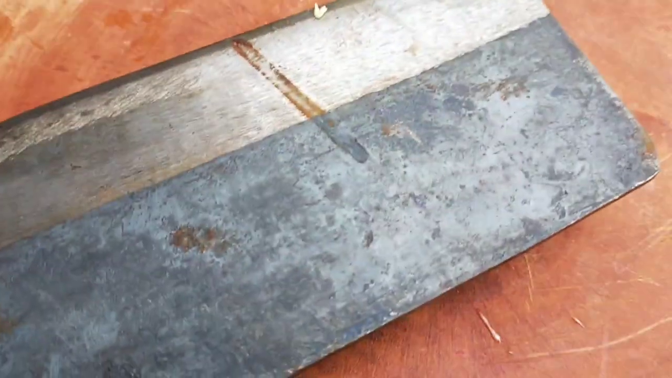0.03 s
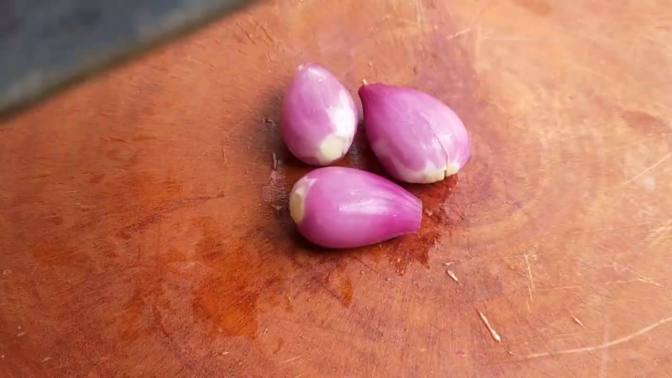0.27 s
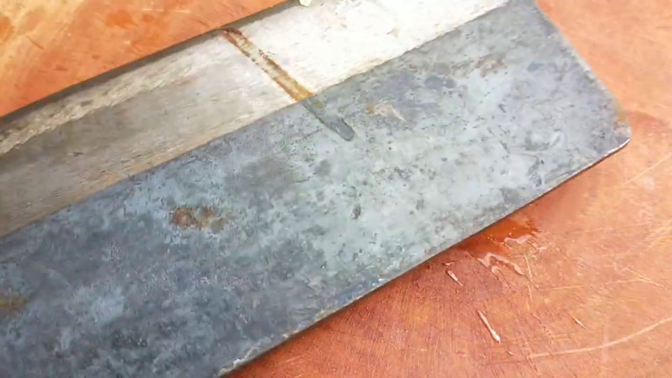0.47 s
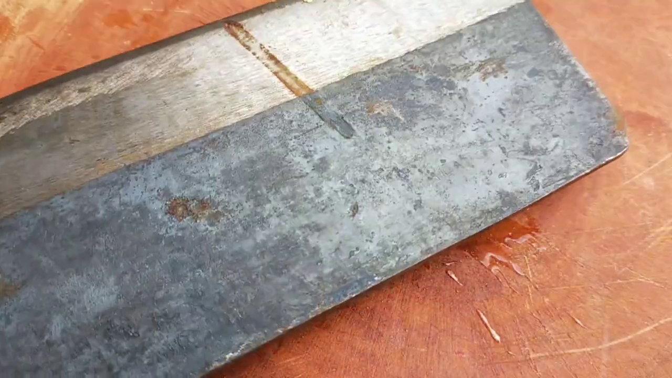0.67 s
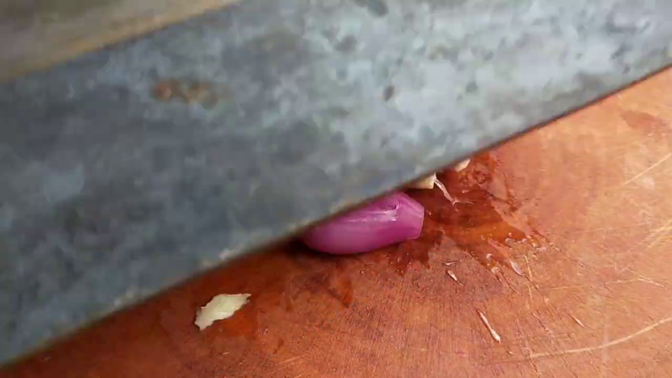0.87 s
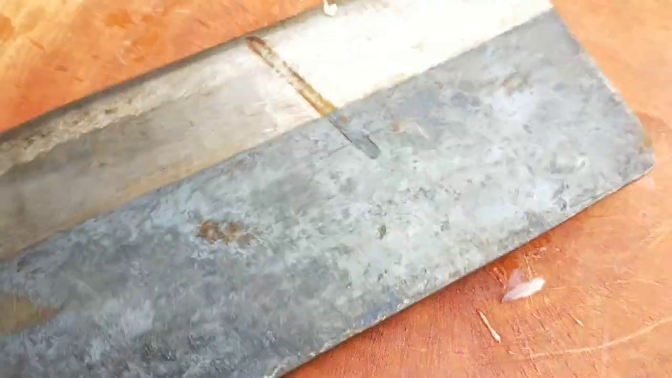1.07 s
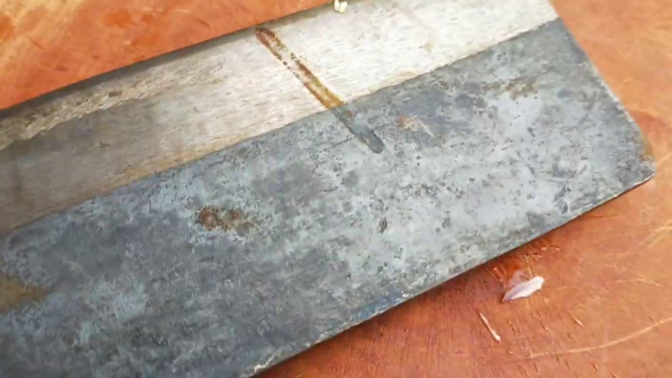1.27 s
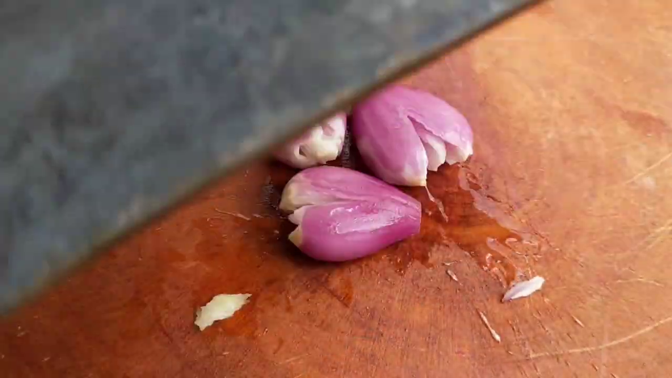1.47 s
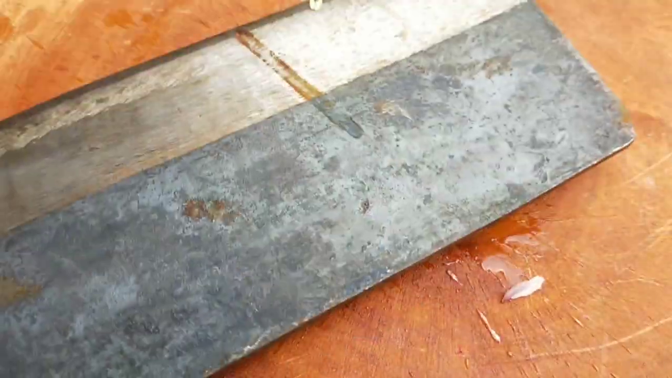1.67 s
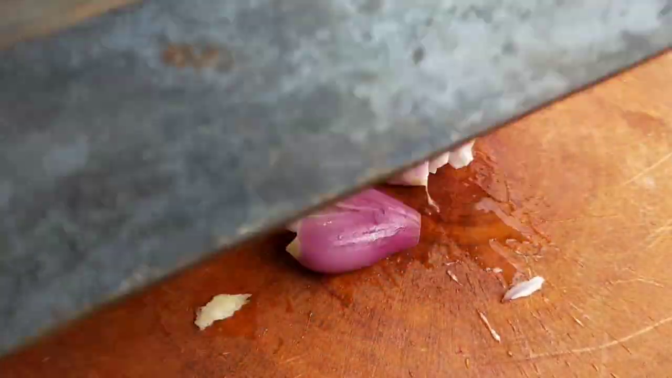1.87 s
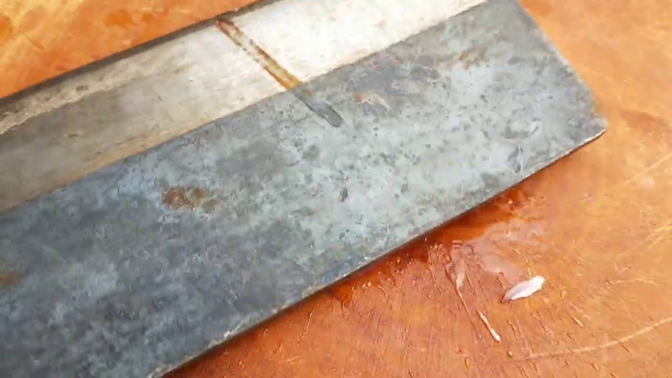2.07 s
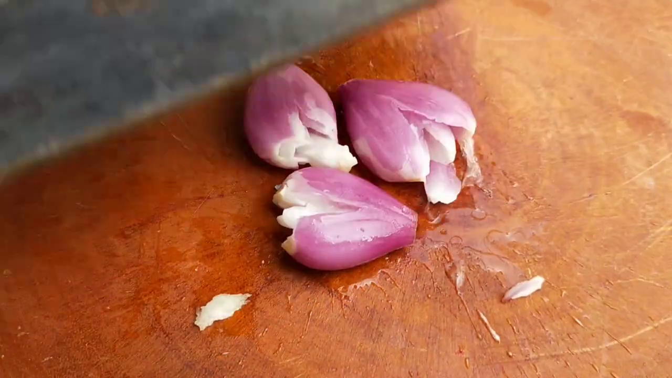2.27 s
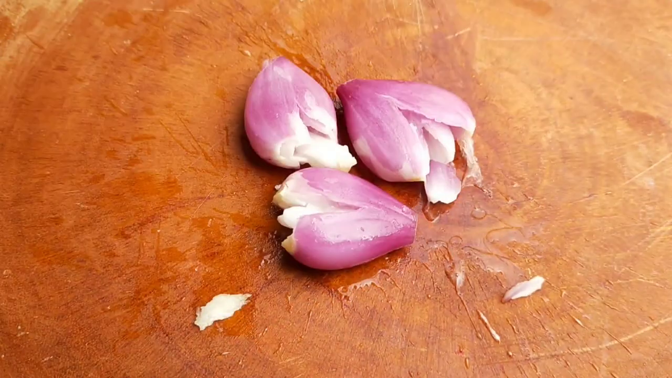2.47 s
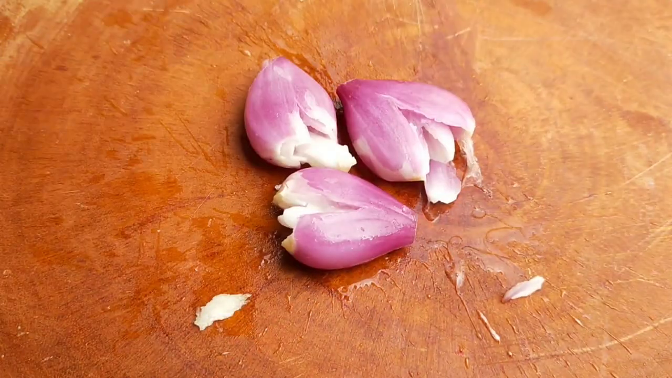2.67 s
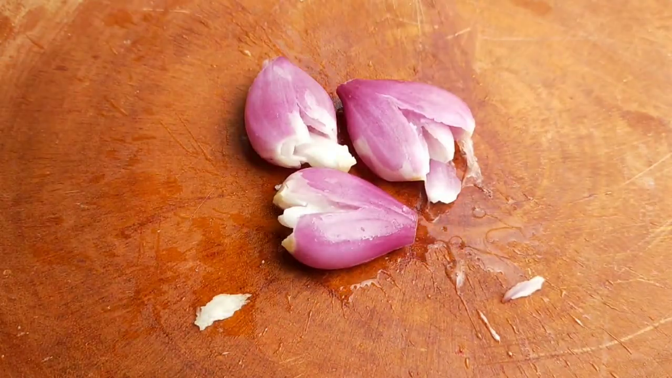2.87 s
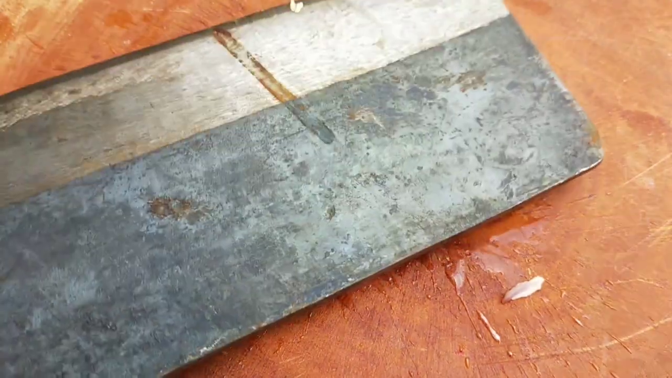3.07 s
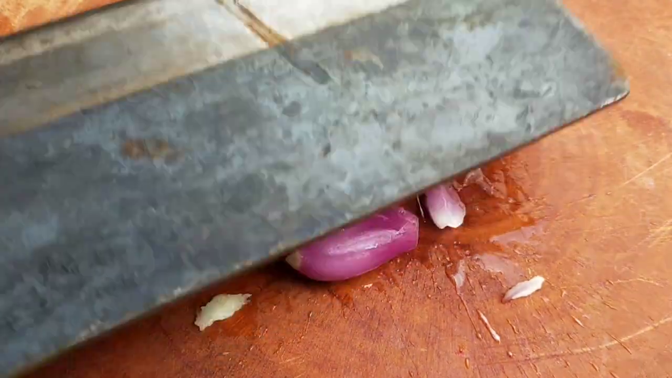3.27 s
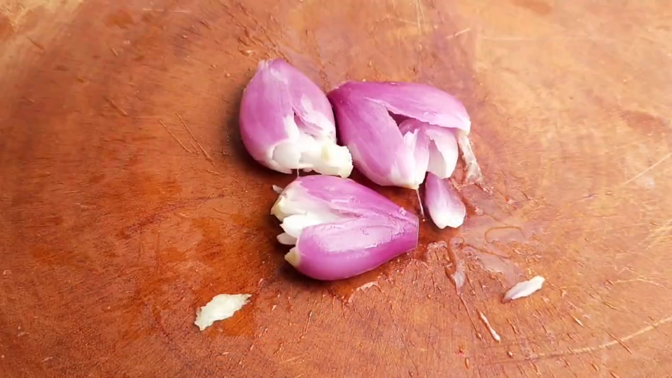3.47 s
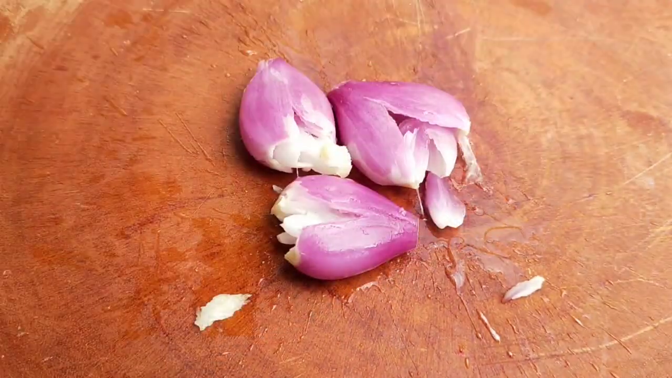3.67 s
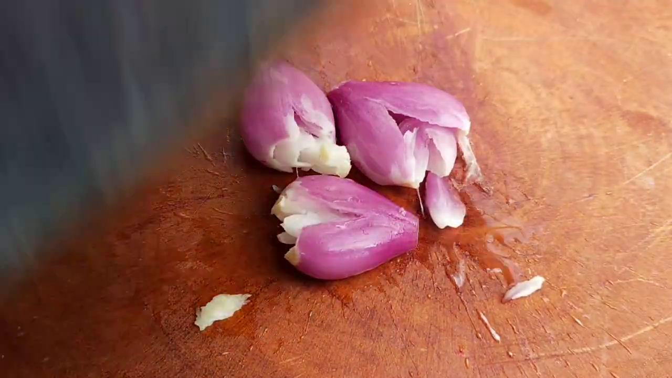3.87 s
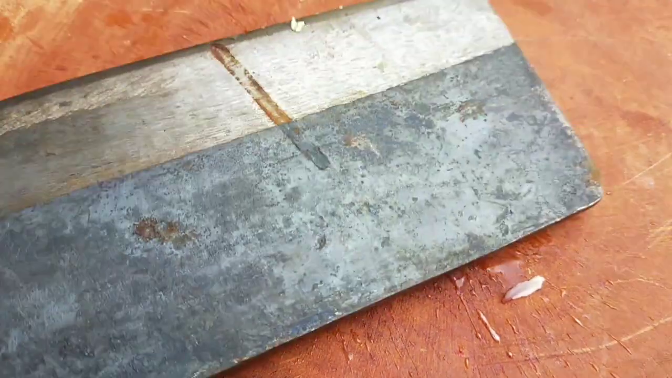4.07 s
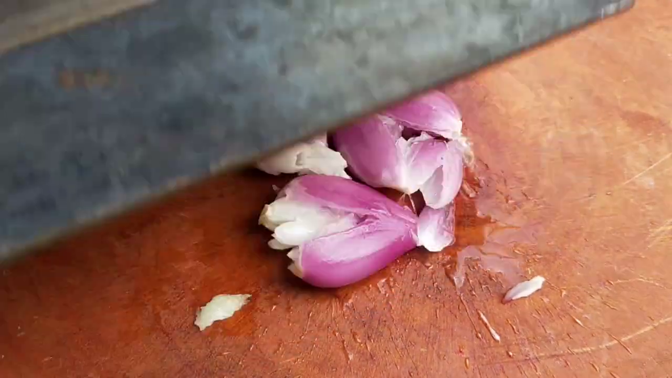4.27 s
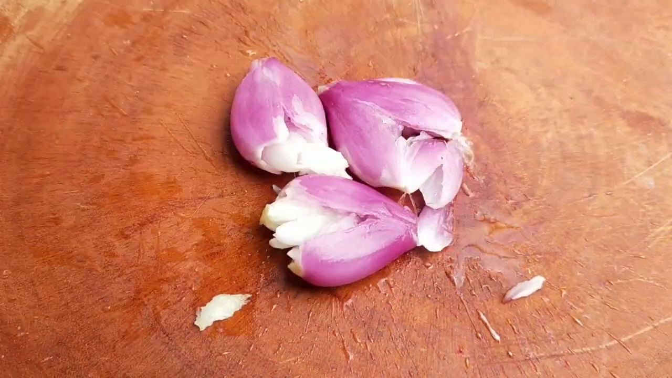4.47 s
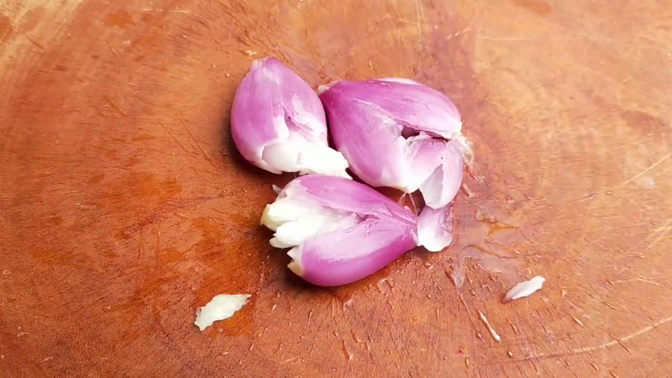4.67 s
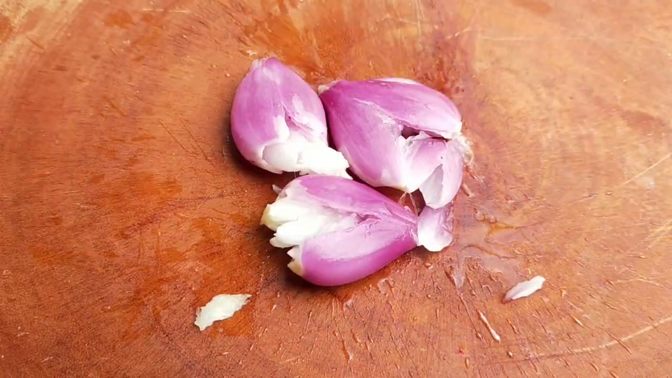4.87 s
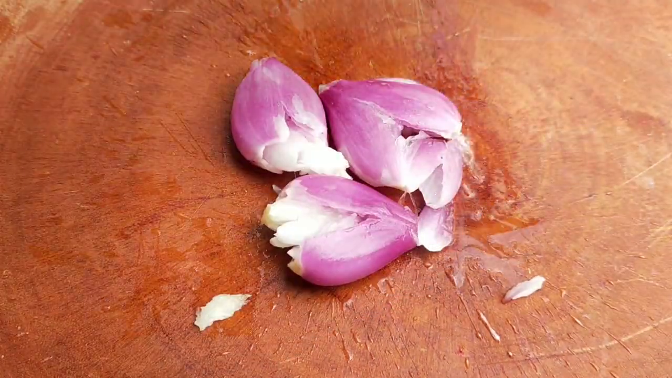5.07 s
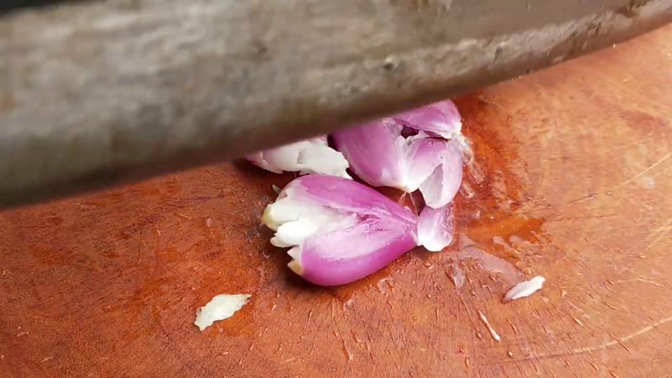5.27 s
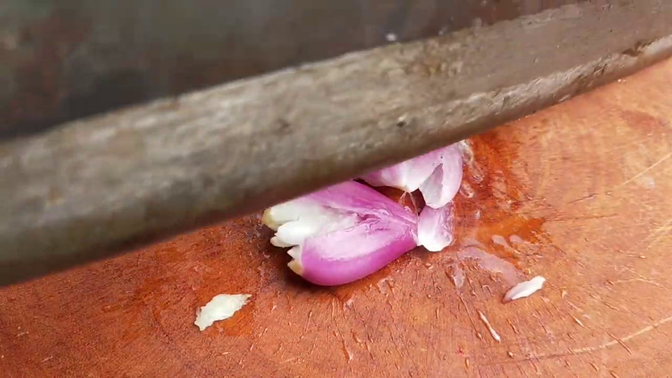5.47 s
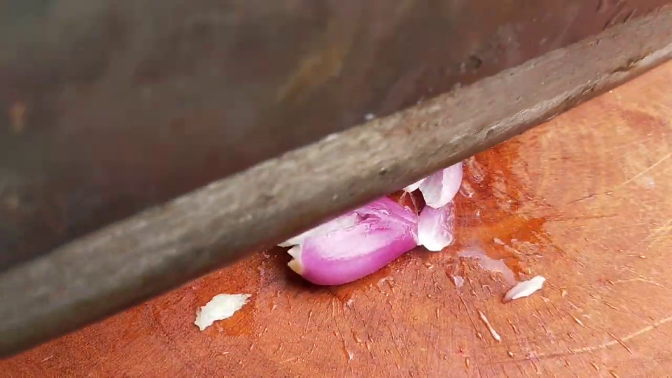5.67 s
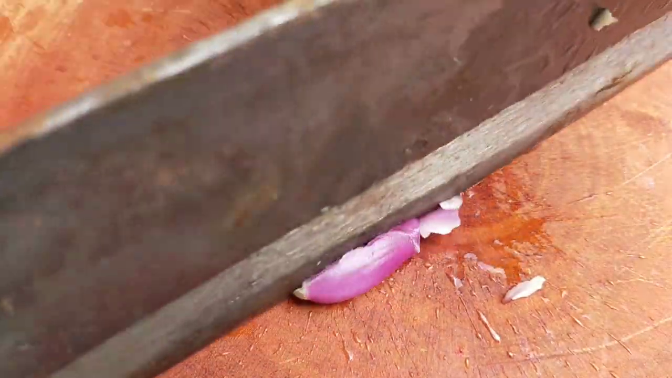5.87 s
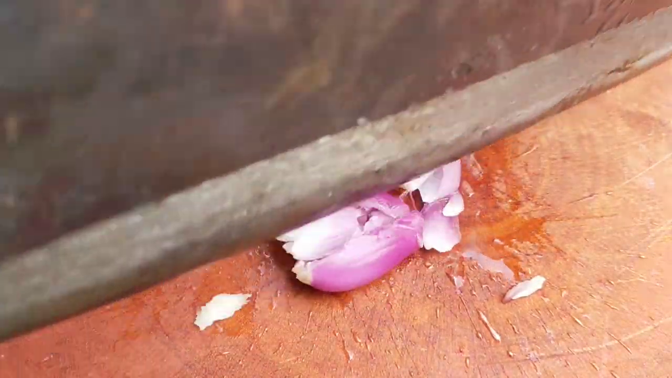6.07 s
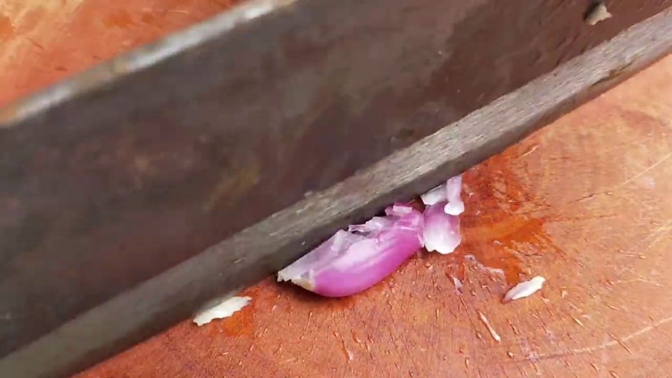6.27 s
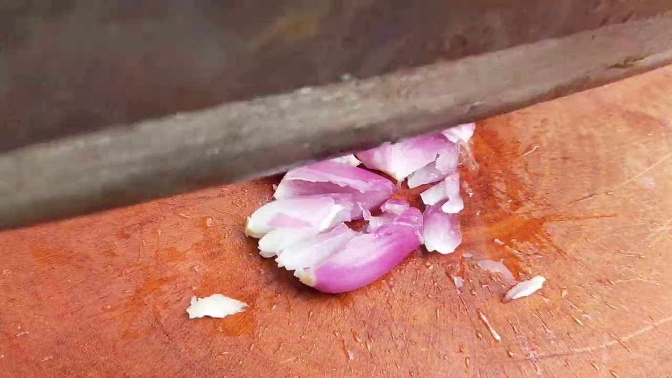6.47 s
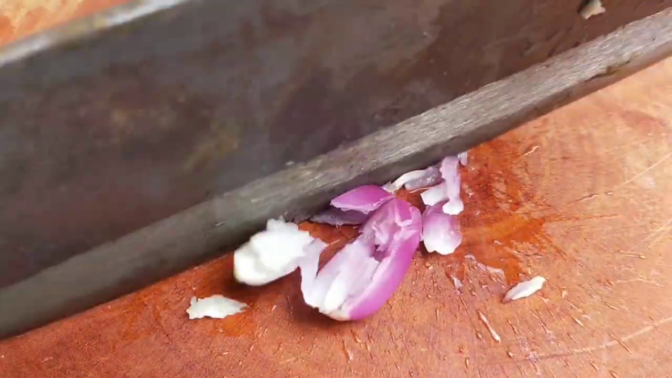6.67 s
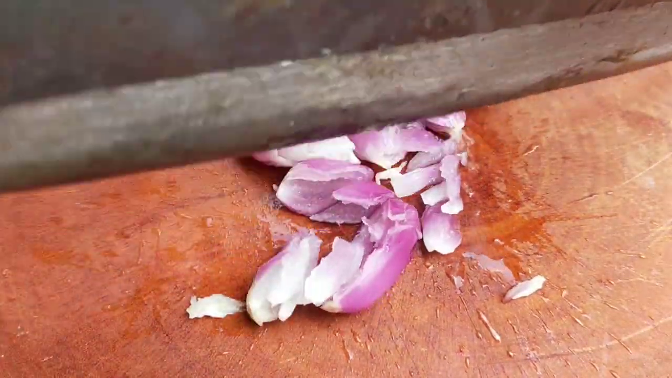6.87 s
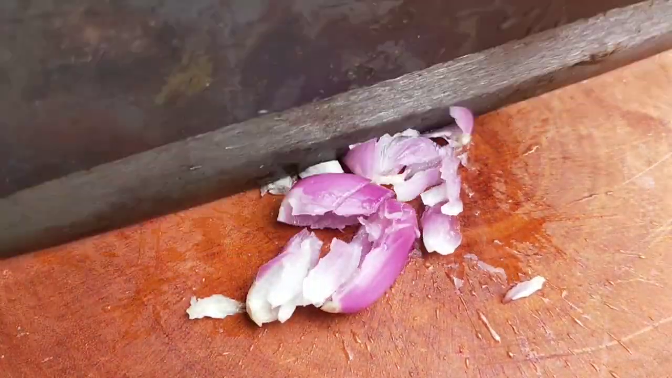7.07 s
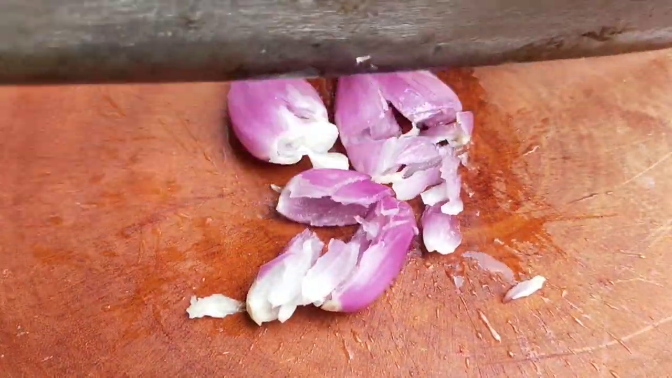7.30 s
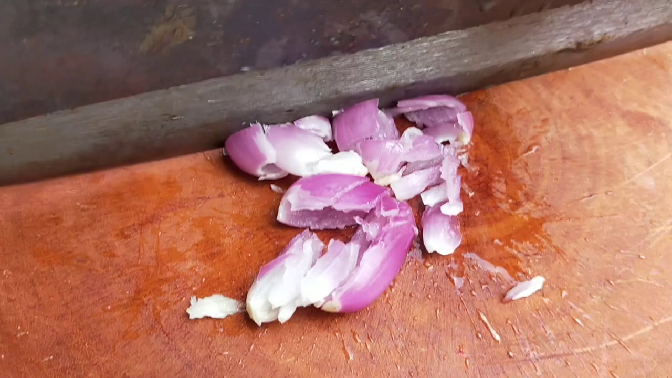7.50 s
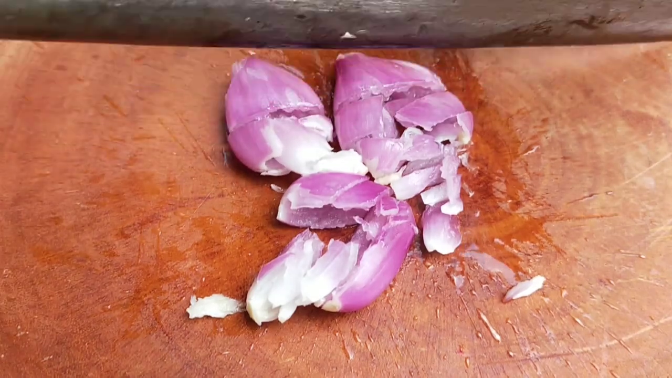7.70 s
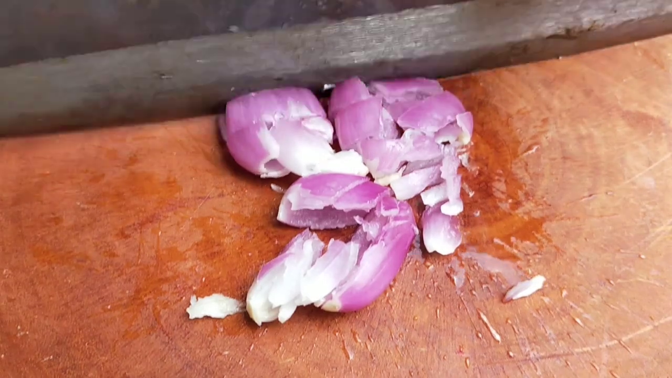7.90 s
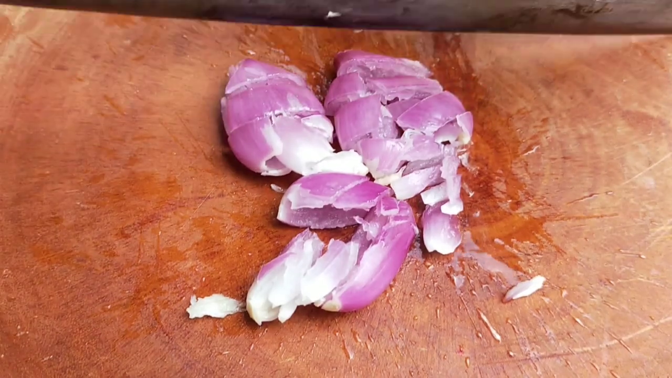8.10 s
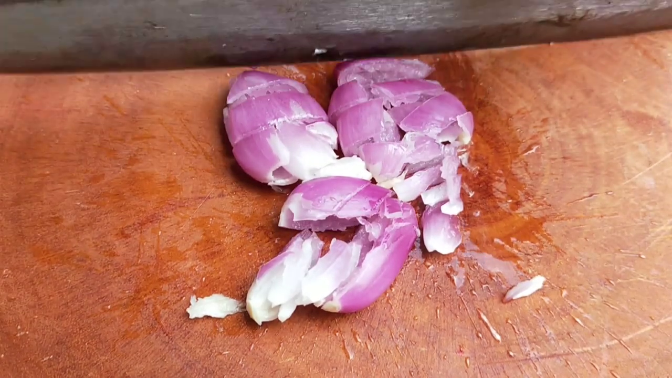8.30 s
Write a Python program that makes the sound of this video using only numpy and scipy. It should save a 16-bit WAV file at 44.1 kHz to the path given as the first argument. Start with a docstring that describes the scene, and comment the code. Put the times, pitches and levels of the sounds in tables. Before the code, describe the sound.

A faint hiss and a low, slowly beating hum sit under a roofed outdoor kitchen, heard from very close to a thick wooden block. At 0.4 s a heavy cleaver slaps flat onto shallots with a hard clack and crisp snap. More muffled, crunchier, wet smacks land at about 1.1, 1.6, 2.0, 3.0 and 3.95 s; the one at 3.0 rings with a high steel note. Each is followed by a short diffuse tail that swells back after the loud peak. From 4.4 to 5.7 s there are soft rustles and thin swishes, with a dull wooden knock at 5.4. Edge cuts then crunch at 5.8, 6.25, 6.65, 7.1, 7.45, 7.85 and 8.2 s, grainy and juicy, with snapping layers and faint wet slides between. Several end in hollow knocks, strongest near 7.5 with a brief blade ring; the last cut is lighter.

```python
"""A low beating hum and a faint hiss come first, in a roofed outdoor kitchen, one microphone very close.
Six slaps with the flat of a heavy cleaver crush shallots on a thick wooden block: noise bursts and ringing modes.
The cleaver is turned with faint rustles; its edge then crunches through in random grains and knocks on the wood.
Roof and walls add a diffuse tail, and the recorder's limiter ducks around each peak above its ceiling."""
import sys
import numpy as np
from scipy import signal
from scipy.fft import rfft, irfft
from scipy.io import wavfile
from scipy.ndimage import uniform_filter1d, minimum_filter1d

SR = 44100
rng = np.random.default_rng(int(sys.argv[2]) if len(sys.argv) > 2 else 0)


def log_audio(samples):
    """Write samples as a 16-bit WAV file to the path given in sys.argv[1]."""
    # one column per channel
    frames = np.atleast_2d(samples).T
    # limit to full scale, then quantise
    limited = np.clip(frames, -1, 1)
    pcm = np.round(limited * 32767).astype(np.int16)
    wavfile.write(sys.argv[1], SR, pcm)


N = 367794
TIME = np.arange(N) / SR   # seconds


def from_db(db):
    """Decibels to gain."""
    return 10 ** (np.asarray(db) / 20)


def rms_one(x):
    """Scale to rms 1."""
    return x / np.sqrt(np.mean(x ** 2) + 1e-20)


def at_hz(points, hz, axis=1):
    """Read a table column on a log-frequency axis."""
    table = np.array(points)
    return np.interp(np.log(hz + 1e-9), np.log(table[:, 0]), table[:, axis])


def filtered(x, order, hz, kind):
    """Butterworth filter of the given kind."""
    return signal.sosfilt(signal.butter(order, hz, kind, fs=SR, output="sos"), x)


def resonance(x, hz, q):
    """Keep one resonant peak."""
    return signal.lfilter(*signal.iirpeak(hz, q, fs=SR), x)


def colour(x, spectrum, size=4096):
    """Causal (minimum-phase) filter with the given spectrum shape; white noise keeps its power."""
    log_gain = np.log(from_db(at_hz(spectrum, np.fft.rfftfreq(size, 1 / SR))))
    cepstrum = irfft(log_gain)
    # folding the cepstrum forward in time makes the response minimum-phase
    cepstrum[1:size // 2] *= 2
    cepstrum[size // 2 + 1:] = 0
    response = irfft(np.exp(rfft(cepstrum)))
    return signal.oaconvolve(x, response / np.linalg.norm(response))[:N]


def drift(rate):
    """Random wander: straight lines between normal draws of spread 1, rate draws per second."""
    knots = rng.standard_normal(4000)
    return np.interp(TIME * rate, np.arange(len(knots)), knots)


def contacts(rows):
    """One force pulse, its area set by the dB, per (s, dB, cut-off Hz): softer contacts last longer."""
    out, age = np.zeros(N), np.arange(SR // 50) / SR
    for s, db, hz in rows:
        pulse = age * np.exp(-2 * np.pi * hz * age)
        at = round(s * SR)
        out[at:at + len(age)] += (from_db(db) * pulse / pulse.sum())[:N - at]
    return out


def ring(force, modes):
    """Decaying modes driven by a force; neighbours swing in opposite senses."""
    out = np.zeros(N)
    for k, (hz, db, t60) in enumerate(modes):
        radius = from_db(-60 / (t60 * SR))
        angle = 2 * np.pi * hz / SR
        poles = [1, -2 * radius * np.cos(angle), radius * radius]
        out += (-1) ** k * from_db(db) * signal.lfilter([.5, 0, -.5], poles, force + 1e-18)
    return out


def grains(per_s, spread_db):
    """Plant cells bursting: random clicks of uneven size, rms 1."""
    heights = from_db(spread_db * np.minimum(rng.exponential(1, N), 4))
    clicks = heights * rng.choice([-1, 1], N)
    return rms_one(clicks * (rng.random(N) < per_s / SR))


def swell(s, rise_s, fall_s):
    """Envelope that grows to 1 at time s and dies away."""
    return np.exp(np.maximum(np.minimum((TIME - s) / rise_s, (s - TIME) / fall_s), -40))


def stroke(s, length, attack_s, release_s, sag_db_per_s):
    """Envelope of one movement: it comes in, holds while changing steadily in dB, and dies away."""
    held = np.clip(TIME - s, 0, length)
    early, late = np.maximum(0, s - TIME), np.maximum(0, TIME - s - length)
    return from_db(-sag_db_per_s * held) * np.exp(-(early / attack_s) ** 2 - (late / release_s) ** 2)


def noise_band(centre_hz, width_hz):
    """A soft noisy resonance; rms 1."""
    band = [centre_hz - width_hz / 2, centre_hz + width_hz / 2]
    return rms_one(filtered(rng.standard_normal(N), 2, band, "band"))


# Steady hum under the kitchen. Each row: frequency in Hz, level in dB rms.
HUM = [(50.8, -49.5), (68.8, -54)]
# Shape of the low rumble. Each row: frequency in Hz, relative density in dB.
RUMBLE = [(15, -6), (30, 0), (52, -3), (85, -11.5), (140, -5.5), (220, -41.5), (600, -65.5)]
# Shape of the faint hiss. Each row: frequency in Hz, relative density in dB.
AIR = [(60, -21.5), (140, -6), (250, -10), (450, -16), (1100, -20), (2500, -20), (4600, -20), (5600, -23.5),
       (7600, -17), (8300, -20), (9200, -36), (12000, -29.5), (15000, -23)]


def background(rumble_db=-56, air_db=-59):
    """Two low hum tones beat against each other over rumble and hiss."""
    hum = np.zeros(N)
    for hz, db in HUM:
        cycles = hz * TIME + rng.random() + 0.034 * drift(rate=2.6)
        hum += np.sqrt(2) * from_db(db) * np.sin(2 * np.pi * cycles)
    rumble = from_db(rumble_db) * colour(rng.standard_normal(N), RUMBLE)
    return hum + rumble + from_db(air_db) * colour(rng.standard_normal(N), AIR)


# The kitchen's tail. Each row: frequency in Hz, relative level in dB, t60 in seconds.
ROOM = [(138, -12, 0.69), (334, -9, 0.62), (515, -13.5, 0.55), (833, -15, 0.66), (1186, -11, 0.44),
        (1627, -8.5, 0.65), (2450, -18, 0.78), (4500, -17.5, 1), (7640, -17.5, 0.87), (14370, -17.5, .65)]


def kitchen(x, build_s=0.0013, count=14):
    """Diffuse tail from roof and walls, dying at its own rate in each band."""
    age = TIME[:SR]
    edges = np.geomspace(80, 17000, count + 1)   # Hz
    spectrum, bins, tail = rfft(rng.standard_normal(SR)), np.arange(SR // 2 + 1), 0
    for low, high in zip(edges, edges[1:]):
        hz = np.sqrt(low * high)
        decay = from_db(-60 * age / at_hz(ROOM, hz, axis=2))
        band = irfft(spectrum * (bins >= low) * (bins < high), SR)
        tail = tail + from_db(at_hz(ROOM, hz)) * band * decay / np.linalg.norm(decay)
    return signal.oaconvolve(x, tail * (1 - np.exp(-age / build_s)))[:N]


def scattered(x, split_hz=4300, size=900):
    """Treble leaves the block differently in every direction, so the walls get an even splash of it."""
    low, high = filtered(x, 2, split_hz, "low"), filtered(x, 2, split_hz, "high")
    power = signal.oaconvolve(high ** 2, np.ones(size) / size)[:N]
    splash = filtered(colour(rng.standard_normal(N), CRUSH), 2, split_hz, "high")
    return low + np.sqrt(np.abs(power)) * rms_one(splash)


def near_echoes(x):
    """Hard surfaces by the block return the sound, once at each of two delays."""
    echoes = [(.0055, -18.5), (.0172, -19.5)]   # delay in seconds, level in dB
    return sum(from_db(db) * np.interp(TIME - delay, TIME, x) for delay, db in echoes)


# Faint rustles close by, mostly while the cleaver is lifted and turned. Each row: start in seconds,
# length in seconds, relative resonance level in dB, its centre in Hz, relative broad hiss level in dB.
RUSTLES = [(0.01, 0.023, -58.5, 2220, -68), (2.882, 0.049, -62, 2580, -57), (3.418, .08, -55.5, 2130, -61),
           (4.503, 0.054, -61, 1940, -57.5), (4.607, 0.076, -57.5, 2500, -57),
           (4.785, 0.12, -50.5, 2380, -51.5), (5.014, 0.094, -53.5, 2090, -60),
           (5.18, 0.26, -55.5, 2610, -60.5), (5.61, 0.1, -56.5, 2800, -57)]
# Shape of the broad hiss. Each row: frequency in Hz, relative density in dB.
RUSTLE_COLOUR = [(600, -26.5), (1500, -10), (2300, -34), (3400, -7), (4600, -17), (9500, -16), (13000, -17),
                 (14500, -2), (16000, -28)]
# Thin high swishes. Each row: start in seconds, length in seconds, relative level in dB, centre in Hz.
SWISHES = [(2.87, 0.064, -71, 6030), (4.362, .24, -63.5, 5370), (4.803, .28, -60.5, 5950),
           (5.467, 0.14, -60, 4950)]


def handling(broad_db=-5, rustle_db=-4, swish_db=-4, uneven_db=1.5):
    """Each rustle is a broad hiss with one resonance of its own; the swishes are a narrow band higher up."""
    broad, out = colour(rng.standard_normal(N), RUSTLE_COLOUR), np.zeros(N)
    for s, length, db, hz, hiss_db in RUSTLES:
        rustle = from_db(db + rustle_db) * noise_band(hz, width_hz=1050)
        rustle += from_db(hiss_db + broad_db) * broad
        out += rustle * stroke(s, length, attack_s=0.033, release_s=0.052, sag_db_per_s=37)
    for s, length, db, hz in SWISHES:
        swish = from_db(db + swish_db) * noise_band(hz, width_hz=830)
        out += swish * stroke(s, length, attack_s=.05, release_s=.07, sag_db_per_s=0)
    return out * from_db(uneven_db * drift(rate=60))


# Wet flesh sliding along the blade between cuts. Each row: start in seconds, length in seconds, level in dB.
SLIDES = [(6.06, 0.2, -54), (6.822, 0.27, -46.5), (7.12, 0.17, -45)]
# Shape of the slide's hiss. Each row: frequency in Hz, relative density in dB.
SLIDE = [(200, 12), (700, 10), (2000, 12.4), (3200, 9.9), (5500, 6.2), (8000, 10.7), (9500, 5.5),
         (12500, 9.1), (14700, 16.3), (16000, 14.4)]


def slides(uneven_db=2.8):
    """Wet flesh hisses along the steel between cuts."""
    sliding = np.zeros(N)
    for s, length, db in SLIDES:
        # a slide starts briskly and slows down
        sliding += from_db(db) * stroke(s, length, attack_s=0.063, release_s=0.24, sag_db_per_s=19.5)
    sliding = sliding * from_db(uneven_db * drift(rate=47))
    return colour(grains(per_s=21000, spread_db=0.5) * sliding, SLIDE)


# Modes of the thick block. Each row: frequency in Hz, relative level in dB, undamped t60 in seconds.
BLOCK = [(134.4, -18, 0.11), (168.5, -16, 0.079), (238.4, -6.5, 0.0097), (334.4, -10, 0.035),
         (444, -11.5, 0.013), (648, -7.5, 0.037), (903, -9.5, 0.0093), (1196, -8.5, 0.0088),
         (2536, -12, 0.011)]


def block(force, modes, push_db, push_hz):
    """The wood gives one pressure push and a short hollow ring."""
    push = filtered(force, 2, push_hz, "high")
    return from_db(push_db) * push + ring(force, modes)


# The edge passing through a shallot. Each row: start in seconds, length in seconds, crunch level in dB,
# slope of the crunch in dB per cut length (below zero it fades), relative push on the block in dB.
CUTS = [(5.821, 0.065, -28.5, -8.5, -40), (6.258, 0.027, -29, 2, -12), (6.655, 0.027, -25.5, -2.5, -17.5),
        (7.074, 0.027, -24.5, -7.5, -8.5), (7.455, 0.031, -23, 1.5, -13), (7.838, 0.033, -20, -14, -3.5),
        (8.203, 0.022, -39.5, -2.5, 5)]
# Snaps of shallot, faint to loud: single layers breaking in the cuts, and at 0.47 s a shred of skin flicking
# against the blade. Each row: time in seconds, level in dB.
SNAPS = [(0.4716, -13), (5.822, -35), (5.837, -17), (5.854, -20), (5.8668, -17.5), (6.266, -13),
         (6.2753, -17), (6.288, -18), (6.6607, -10.5), (7.0676, -13.5), (7.0802, -11.5), (7.4557, -23.5),
         (7.844, -13), (7.86, -19), (8.2094, -23)]
# Shape of the crunch. Each row: frequency in Hz, relative density in dB.
CRUNCH = [(70, -26), (180, 10), (500, 4), (1400, -4), (1900, -2.5), (2400, 3.5), (3500, -2.5),
          (4600, -11.5), (8000, 0), (9500, -7.5), (12500, -7), (14500, 5), (16000, -1)]
# Shape of a snap. Each row: frequency in Hz, relative density in dB.
SNAP = [(100, -43), (600, -10), (2400, -5), (4600, -9.5), (8000, 3), (10000, -14.5), (12500, -1),
        (15000, 9.5), (16000, 6.5)]


def cuts(push_db=-15, push_hz=450, bite_s=0.0035, attack_s=0.0086, release_s=0.011):
    """Cells burst densely along each cut, whole layers snap, and the jerky force shakes the block."""
    tearing, pushing = np.zeros(N), np.zeros(N)
    for s, length, db, slope, push in CUTS:
        cut = from_db(db) * stroke(s + bite_s, length - bite_s, attack_s, release_s, -slope / length)
        tearing += cut
        pushing += cut * from_db(push)
    snapping = sum(from_db(db) * swell(s, rise_s=0.00087, fall_s=0.0017) for s, db in SNAPS)
    cells = grains(per_s=6800, spread_db=3.0)
    clumps = from_db(2.5 * drift(rate=300))
    force = filtered(cells * pushing, 1, push_hz, "low")
    crunch = colour(cells * clumps * tearing, CRUNCH)
    snaps = colour(rng.standard_normal(N) * snapping, SNAP)
    return crunch + snaps + from_db(push_db) * ring(force, BLOCK)


# The edge meeting the wood. Each row: time in seconds, relative force in dB, contact cut-off in Hz,
# edge ring in dB relative to that force.
KNOCKS = [(5.3850, -8.5, 296, -26), (5.8261, -20, 500, -10), (7.0771, -13, 596, -13), (7.4819, 0, 880, -4),
          (7.8371, -11, 880, -11), (7.843, -13, 696, -7), (8.2205, -27, 820, -15),
          (8.2296, -14.5, 875, -20), (8.282, -33, 1200, -15)]
# Modes of the blade struck on its edge. Each row: frequency in Hz, relative level in dB, t60 in seconds.
BLADE_EDGE = [(995, 5, 0.051), (1130, 6, 0.017), (1380, -25, 0.025), (1590, -5.5, 0.027),
              (2320, 3.5, 0.021)]


def knocks(low_cut_hz=130, wood_db=3, push_db=21, push_hz=200, bedded_t60_s=0.074,
           bloom_db=41, bloom_hz=1150, bloom_q=2.3, ring_room_db=-7):
    """The thin edge beds into the wood and damps its ring; the blade rings briefly.

    Returns the close sound and, with a broad bloom, what is thrown outwards."""
    force = contacts([(s, db + wood_db, hz) for s, db, hz, edge in KNOCKS])
    force = filtered(force, 2, low_cut_hz, "high")
    damped = [(hz, db, 1 / (1 / t60 + 1 / bedded_t60_s)) for hz, db, t60 in BLOCK]
    wood = block(force, damped, push_db, push_hz)
    jolt = contacts([(s, db + edge, hz) for s, db, hz, edge in KNOCKS])
    steel = -ring(jolt, BLADE_EDGE)
    bloom = from_db(bloom_db) * resonance(jolt, bloom_hz, bloom_q)
    return wood + steel, wood + from_db(ring_room_db) * steel - bloom


# Flat slaps. Each row: time in seconds, force in dB, contact cut-off in Hz, relative crush in dB,
# wet squelch in dB, blade main note in dB, other blade modes in dB, clack gain in dB.
SLAPS = [(0.4126, -1, 940, 1.5, -28.5, -5, 10, 1), (1.066, 2.5, 700, 6, -29, -5, -27.5, -11),
         (1.5613, 1, 765, 7, -31, -5.5, -16.5, -5), (2.0102, 2, 860, 7.5, -23.5, -19, -17.5, -7),
         (3.0114, 3.5, 890, 6, -19.5, 9, -15, -3.5), (3.9500, 4, 990, 9.5, -18, -1, -19.5, -3)]
# Shape of the crush. Each row: frequency in Hz, relative density in dB.
CRUSH = [(70, -42), (200, -10.5), (700, -3.5), (1600, 3.5), (2600, 5.5), (3600, -1.5), (4600, -6.5),
         (6200, -7), (8100, 0.5), (10000, -12), (12500, -7), (15000, 3.5), (16000, 1.5)]
# Main note of the flat blade. Each row: frequency in Hz, relative level in dB, t60 in seconds.
BLADE_NOTE = [(3177, -27, .3)]
# Other modes of the flat blade, below and above its main note. Each row: frequency in Hz,
# relative level in dB, t60 in seconds.
BLADE_OTHER_MODES = [(1910, -47, 0.553), (2100, -39, 0.21), (2596, -21, 0.025), (2910, -45, 0.26),
                     (3620, -41, 0.22)]


def slaps(lead_s=0.0013, gap_s=0.00434, crush_db=-8.0, clack_hz=2100, clack_q=1.13, ring_room_db=-7):
    """The flat blade bursts the shallots as it closes the last gap; juice squelches, wood and steel ring.

    Returns the close sound and what is thrown outwards."""
    force = contacts([row[:3] for row in SLAPS])
    bursting, clack, note, other_modes = np.zeros(N), np.ones(N), [], []
    for s, db, hz, crush, wet, note_db, other_db, clack_db in SLAPS:
        closing = TIME > s - gap_s
        bursting += from_db(crush + crush_db) * swell(s - lead_s, rise_s=0.00063, fall_s=0.003) * closing
        bursting += from_db(wet) * swell(s, rise_s=.0005, fall_s=0.042)
        clack[closing] = from_db(clack_db)
        # where the blade lands decides which of its modes ring
        note.append((s, note_db, 9000))
        other_modes.append((s, other_db, 9000))
    steel = ring(contacts(note), BLADE_NOTE) + ring(contacts(other_modes), BLADE_OTHER_MODES)
    cells = grains(per_s=32000, spread_db=-1.0) * bursting
    blow = block(force, BLOCK, push_db=32.5, push_hz=220) + colour(cells, CRUSH)
    # the hard middle of a slap is muffled where flesh cushions the blade
    blow = blow + (clack - 1) * resonance(blow, clack_hz, clack_q)
    return blow + steel, blow + from_db(ring_room_db) * steel


def scene(cut_room_db=-1, knock_low_hz=350):
    """All sources reach one microphone, alike in both channels; the thin edge sends little bass outwards."""
    (slap, slap_out), (knock, knock_out), cut = slaps(), knocks(), cuts()
    work = slap + knock + cut
    knock_out = filtered(knock_out, 1, knock_low_hz, "high")
    thrown = slap_out + knock_out + from_db(cut_room_db) * cut
    mono = work + near_echoes(work) + kitchen(scattered(thrown)) + slides() + handling() + background()
    return np.array([mono, mono])


def record(dry, ceiling_db=-1.47, hold_s=0.064, release_db_per_s=330, cutoff_hz=15900):
    """A peak limiter ducks, holds and lets go, so the tail swells back; the top is cut."""
    over = np.maximum(0, 20 * np.log10(np.abs(dry[0]) + 1e-9) - ceiling_db)
    half = int(hold_s * SR / 2)
    held = -minimum_filter1d(-over, 2 * half + 1, origin=half)
    released = np.maximum.accumulate(held + release_db_per_s * TIME) - release_db_per_s * TIME
    # the gain falls just ahead of the peak
    duck = uniform_filter1d(-minimum_filter1d(-released, size=400), size=400)
    top_cut = signal.ellip(10, .1, 80, cutoff_hz, fs=SR, output="sos")
    return signal.sosfilt(top_cut, dry * from_db(-duck))


dry = scene()
out = record(dry)
log_audio(out)
```